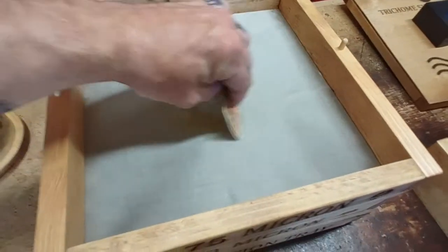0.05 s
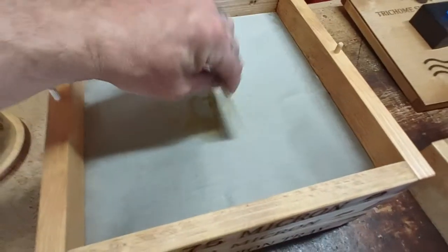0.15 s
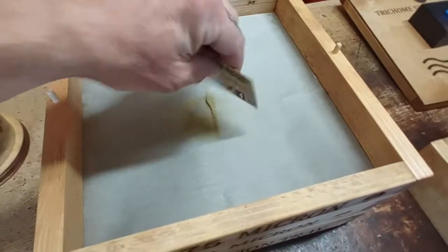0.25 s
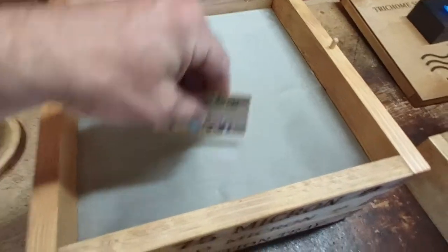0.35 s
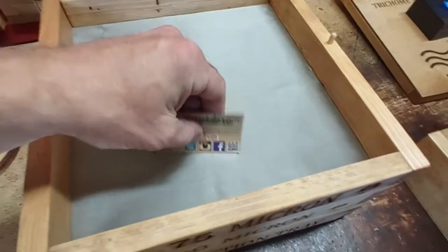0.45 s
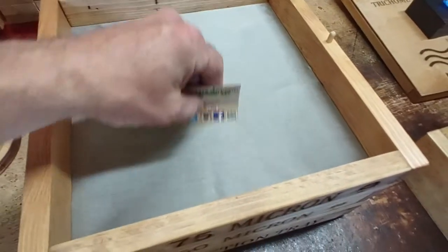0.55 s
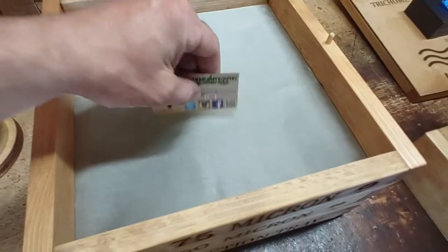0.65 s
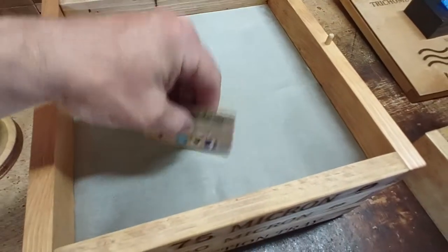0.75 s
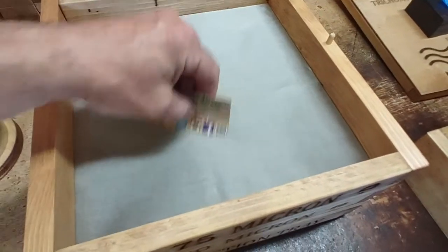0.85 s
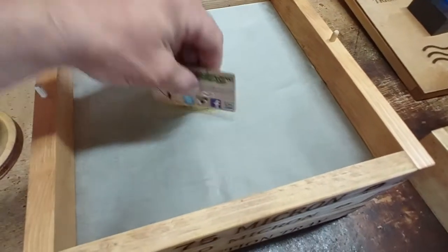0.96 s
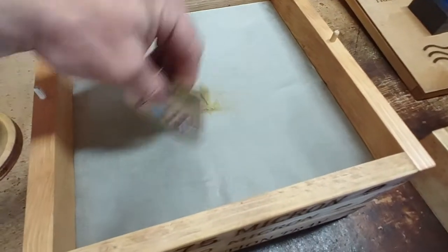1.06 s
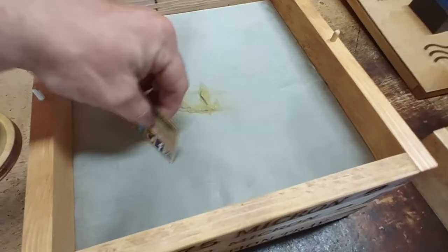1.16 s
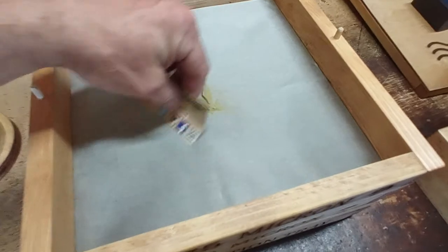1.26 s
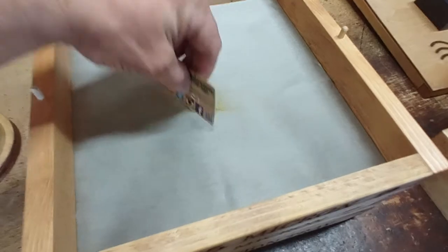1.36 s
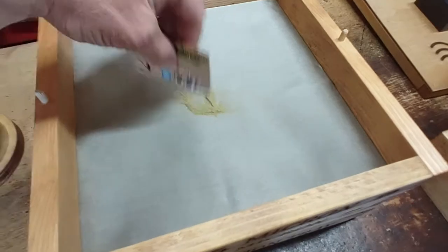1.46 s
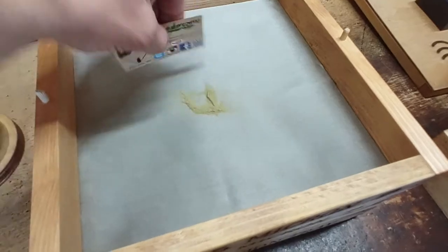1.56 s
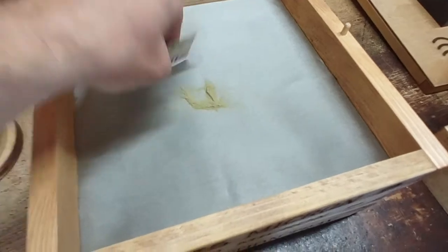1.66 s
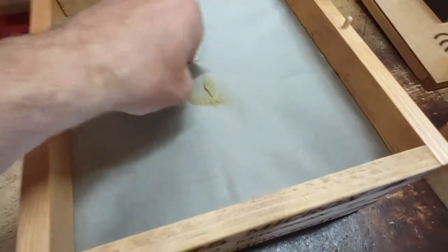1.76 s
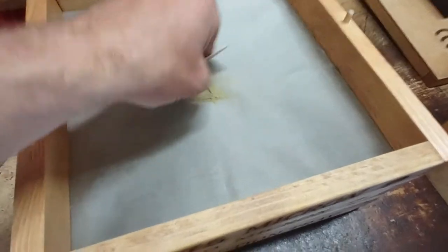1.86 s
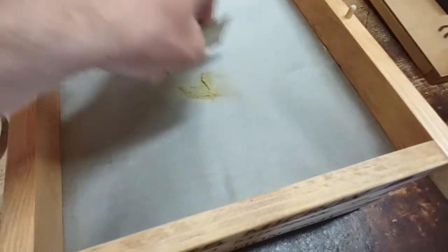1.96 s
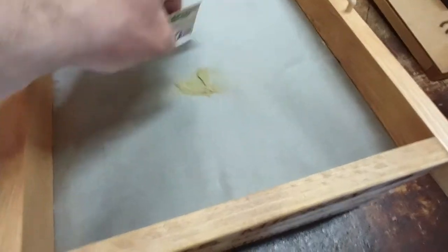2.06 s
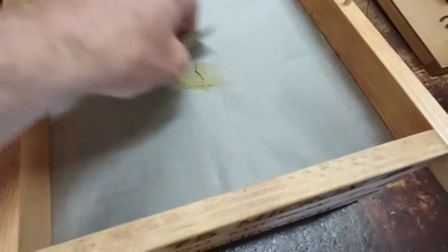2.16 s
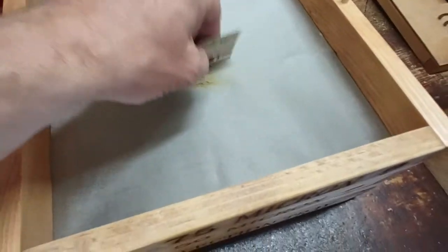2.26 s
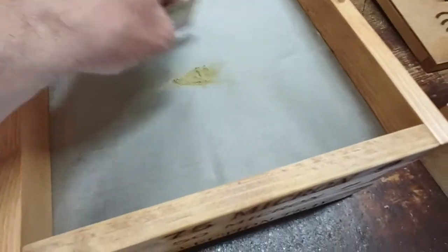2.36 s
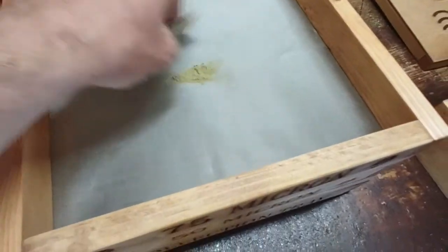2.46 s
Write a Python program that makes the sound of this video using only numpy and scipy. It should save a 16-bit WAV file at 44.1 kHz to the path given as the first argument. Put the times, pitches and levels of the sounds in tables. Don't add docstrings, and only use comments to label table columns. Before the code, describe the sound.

Quick raspy scrapes of a stiff card on fine stretched mesh, first two strongest, then a longer one, a pause with dull taps, and three more; faint finger rustle on the microphone, small quiet room, close.

```python
import sys
import numpy as np
from scipy import signal
from scipy.fft import rfft, irfft
from scipy.io import wavfile

SR = 44100
rng = np.random.default_rng(int(sys.argv[2]) if len(sys.argv) > 2 else 0)


def voltage_ratio(level):
    return 10 ** (np.asarray(level, float) / 20)


def generate_wav(sig):
    pcm = np.round(np.clip(np.atleast_2d(sig).T, -1, 1) * 32767).astype(np.int16)
    wavfile.write(sys.argv[1], SR, pcm)


N = 112455
TIME = np.arange(N) / SR

TRAY_HZ = 1187
RUN_IN_S = 1


def rms_one(x):
    return x / np.sqrt(np.mean(x ** 2) + 1e-20)


def cut(x, hz, kind, order=2):
    return signal.sosfilt(signal.butter(order, hz, kind, fs=SR, output="sos"), x)


def drift(hz):
    run_in = RUN_IN_S * SR
    return rms_one(cut(rng.standard_normal(N + run_in), hz, "low")[run_in:])


def resonance(x, hz, width_hz):
    r = np.exp(-np.pi * width_hz / SR)
    top = np.array([1, 0, -1]) * (1 - r * r) / 2
    return signal.lfilter(top, [1, -2 * r * np.cos(2 * np.pi * hz / SR), r * r], x)


def bells(x, rows):
    for hz, width_hz, db in rows:
        turn = -2 * np.cos(2 * np.pi * hz / SR)
        a = np.sqrt(voltage_ratio(db))
        k = np.tan(np.pi * width_hz / SR)
        x = signal.lfilter([1 + k * a, turn, 1 - k * a], [1 + k / a, turn, 1 - k / a], x)
    return x


def tail(x, t60):
    t = np.arange(SR // 2) / SR
    h = rng.standard_normal((2, len(t))) * voltage_ratio(-60 * t / t60)
    h = h / np.sqrt(np.sum(h ** 2, 1, keepdims=True))
    return signal.fftconvolve(x[None], h, axes=1)[:, :N]


def wire_ticks():
    ticks_per_s, spread_db = 9000, 2.0
    chatter_db, chatter_hz = 0.9, 125
    hits = rng.random((2, N)) < ticks_per_s / SR
    strength = voltage_ratio(spread_db * np.minimum(rng.exponential(1, (2, N)), 4))
    ticks = rms_one(hits * strength * rng.choice([-1, 1], (2, N)))
    return ticks * voltage_ratio(chatter_db * drift(chatter_hz))


# time in seconds, level in dB.
STROKES = [
    [(0.16, -58), (0.182, -54.5), (0.202, -28), (0.22, -24), (0.262, -19.5), (0.306, -25), (0.335, -62)],
    [(0.503, -74), (0.511, -47), (0.529, -45.5), (0.543, -26.5), (0.567, -20.5), (0.609, -19), (0.66, -55)],
    [(0.838, -70), (0.848, -58.5), (0.874, -56), (0.916, -29.5), (0.946, -26.5), (1.048, -26),
     (1.064, -44.5), (1.09, -71)],
    [(1.452, -44), (1.466, -38), (1.492, -29.5), (1.522, -33.5), (1.582, -24.5), (1.612, -29), (1.618, -31),
     (1.645, -66)],
    [(1.805, -64), (1.817, -51.5), (1.845, -45), (1.863, -31.5), (1.895, -26), (1.927, -22.5),
     (1.973, -25.5), (2.0, -62)],
    [(2.14, -75), (2.152, -45), (2.184, -26.5), (2.262, -29.5), (2.285, -64)],
]
# tray drumming in dB at start, at end, brightness in dB at start, at end.
STROKE_COLOURS = [(1, -14.5, 1, 0), (2.5, -23.5, 3, 0.93), (7.5, -15, 3, 1.2), (2, -27.5, -2.5, 1),
                  (-16.5, -4.5, 1, -3.5), (-31, -5.5, 1, 0)]
# level in dB of deep tray, high tray, card bend,
# card edge, wires, and then of the tray at the right port.
STROKE_VOICING = [(4.5, -2, 2.5, 0, 0.91, -3), (-14, -3.3, 2.5, -0.77, 1.6, -9.5),
                  (0.5, 0.48, 0.5, 0.71, 1.5, -14.5), (-8, -1.9, -1.5, -0.39, 2.8, 1.5),
                  (-11, 1.6, -5, -1, 1.4, -3), (-5, 2.8, -3, -1.6, 2.6, 0)]
# pitch in Hz, width in Hz, level in dB.
BODY_RESONANCES = [(555, 55, 0.5), (734, 183, -4), (852, 42, -2), (1361, 94, -0.5), (1457, 620, -11.5),
                   (2186, 127, -4), (2586, 250, -7), (3093, 194, 1), (4020, 670, 3), (3450, 144, -3),
                   (4896, 205, -1), (5418, 207, 2.5), (6030, 136, -11), (10740, 2130, -4)]
RESONANCE_FAMILY = [0, 1, 1, 2, 2, 3, 3, 3, 3, 3, 4, 4, 4, 6]


def scrape():
    fade_s = 0.013
    bright_hz, low_cut_hz = 4530, 413
    plain_db, sway_db, sway_hz = -6.5, 3.8, 30.0
    press, tray_db, bright_db = np.zeros((3, N))
    voice = np.zeros((7, N))
    for rows, colour, voicing in zip(STROKES, STROKE_COLOURS, STROKE_VOICING):
        s, db = np.transpose(rows)
        ends = s[[0, -1]]
        contact = np.clip(np.minimum(TIME - s[0], s[-1] - TIME) / fade_s, 0, 1)
        press += contact * voltage_ratio(np.interp(TIME, s, db))
        tray_db += (contact > 0) * np.interp(TIME, ends, colour[:2])
        bright_db += (contact > 0) * np.interp(TIME, ends, colour[2:])
        voice[:6, TIME > s[0]] = np.array(voicing)[:, None]
    ticks = wire_ticks()
    low = cut(ticks, TRAY_HZ, "low", order=4)
    middle = cut(cut(ticks, TRAY_HZ, "high", order=4), bright_hz, "low")
    high = cut(ticks, bright_hz, "high")
    drive = press * (voltage_ratio(tray_db) * low + middle + voltage_ratio(bright_db) * high) + 1e-18
    body = voltage_ratio(plain_db) * drive
    for (hz, width_hz, db), family in zip(BODY_RESONANCES, RESONANCE_FAMILY):
        level_db = db + voice[family] + sway_db * drift(sway_hz)
        body = body + resonance(drive * voltage_ratio(level_db), hz, width_hz)
    return voltage_ratio(2.5) * cut(body, low_cut_hz, "high", order=4), voice[5]


# start in seconds, level in dB, length in seconds,
# pitch in Hz, sharpness of the pitch (Q).
TOUCHES = [(0.013, -68, 0.093, 2650, 40), (0.054, -61, 0.14, 1450, 30.), (0.106, -64, 0.1, 2214, 20),
           (0.027, -65, 0.2, 1876, 30.), (.238, -36.5, 0.013, 1330, 15.), (0.297, -28, 0.014, 1340, 10),
           (0.885, -45, 0.03, 2900, 20), (0.507, -47.5, 0.021, 2130, 12.), (0.507, -56, 0.019, 3500, 22),
           (0.633, -34, 0.017, 1450, 10), (0.648, -55, .11, 2430, 22.), (0.843, -48, 0.025, 1750, 8),
           (.858, -50, .03, 2050, 10), (.845, -62, .02, 6500, 14), (.881, -56, 0.004, 7550, 2.5),
           (1.05, -33.5, .03, 1810, 6.6), (1.338, -44, 0.016, 2300, 6), (1.337, -54, 0.014, 5600, 12),
           (0.508, -56, .003, 5000, 1.2), (2.357, -66, .02, 3900, 12), (1.64, -62, .06, 2250, 12),
           (.33, -53, .04, 2200, 5), (1.395, -43, 0.016, 2300, 5), (1.397, -54, .018, 4900, 10),
           (1.4, -56, .03, 4000, 14), (1.396, -40.5, 0.028, 1330, 8.), (1.413, -50, .014, 2500, 4),
           (1.468, -44, .02, 900, 10), (1.81, -61, .035, 2600, 2.5), (1.815, -58, .03, 3900, 12),
           (1.9, -42, .08, 830, 9), (2.144, -42, .016, 1900, 3), (2.155, -44, .014, 3900, 10),
           (2.25, -40, .022, 850, 9), (1.837, -59, 0.0018, 9000, 2.5), (2.355, -64, 0.033, 6000, 2.1),
           (2.417, -72, 0.0035, 5000, 1.5), (2.495, -65.5, 0.034, 1700, 12)]


def touches():
    out = np.zeros((2, N))
    grit = rng.standard_normal((2, N))
    for s, db, length, hz, q in TOUCHES:
        shape = np.sin(np.pi * np.clip((TIME - s) / length, 0, 1) ** 0.6)
        ring = resonance(shape * grit + 1e-18, hz, hz / q)
        ring = resonance(ring, hz, 3 * hz / q)
        out += voltage_ratio(db) * np.sqrt(q * SR / hz / 3) * ring
    return out


# pitch in Hz, level in dB, time to fade 60 dB in seconds.
SNAP_MODES = [(2300, 0, .008), (3300, -5, .004), (5400, -1, .006), (7200, -5, .004)]
# delay in seconds, level in dB.
SNAP_BOUNCES = [
    (0, 0),
    (.0019, -4),
    (.0046, -7),
    (.0071, -11),
]


def snap():
    start_s, level_db = 1.6175, -20
    delay_s, bounce_db = np.transpose(SNAP_BOUNCES)
    age = np.maximum(TIME - start_s - delay_s[:, None], 0)
    rings = 0
    for hz, db, t60 in SNAP_MODES:
        rings = rings + voltage_ratio(level_db + db - 60 * age / t60) * np.sin(2 * np.pi * hz * age)
    return cut(voltage_ratio(bounce_db) @ rings, TRAY_HZ, "high", order=4)


# start in seconds, level in dB, pitch in Hz.
BUMPS = [(1.34, -45, 224), (1.395, -49, 330), (1.411, -37, 270), (1.418, -47, 480), (1.424, -42, 130),
         (1.43, -38.5, 205), (2.33, -53, 350), (2.517, -46, 314)]


def bumps():
    t60_s, rise_s = 0.08, 0.003
    out = np.zeros(N)
    for s, db, hz in BUMPS:
        age = np.maximum(TIME - s, 0)
        rise = (1 - np.exp(-age / rise_s)) ** 2
        out += voltage_ratio(db - 60 * age / t60_s) * rise * np.sin(2 * np.pi * hz * age)
    return out


# time in seconds, level in dB.
RUSTLE = [(0, -48.5), (0.013, -48.5), (0.051, -56.5), (0.098, -57.5), (.14, -50), (.19, -48.5),
          (.41, -60.5), (.5, -58.5), (.77, -68), (0.833, -69), (.85, -51.5), (1.09, -50.5), (1.22, -51),
          (1.44, -48.5), (1.7, -53.5), (1.8, -58), (2.07, -67), (2.141, -81)]
# pitch in Hz, width in Hz, level in dB.
RUSTLE_PEAKS = [(10350, 330, 2), (10800, 300, -9), (11400, 330, 3), (11950, 350, -1), (12400, 500, -8)]
# start in seconds, length in seconds, level in dB.
FLICK = (2.355, 0.023, -54.5)


def rustle():
    streak_db, streak_hz = 1.5, 7.4
    right_db, body_db = -10, -14.5
    level_db, flicker_db, flicker_hz = 4.5, -0.5, 40.0
    noise = rng.standard_normal((2, N))
    streaks = 0
    for hz, width_hz, db in RUSTLE_PEAKS:
        streak = resonance(resonance(noise, hz, width_hz), hz, width_hz)
        streaks = streaks + voltage_ratio(db + streak_db * drift(streak_hz)) * streak
    hiss = rms_one(streaks) * voltage_ratio([[0], [right_db]])
    hiss = hiss + voltage_ratio(body_db) * cut(noise, 1500, "high")
    s, db = np.transpose(RUSTLE)
    flick_s, flick_length_s, flick_db = FLICK
    flick = np.sin(np.pi * np.clip((TIME - flick_s) / flick_length_s, 0, 1))
    level = voltage_ratio(np.interp(TIME, s, db)) + voltage_ratio(flick_db) * flick
    return hiss * level * voltage_ratio(level_db + flicker_db * drift(flicker_hz))


# frequency in Hz, level in dB per Hz.
AIR = [(25, -56), (55, -27.5), (110, -5.5), (400, -6), (780, -13.5), (2000, -25), (5000, -36.5),
       (14000, -48)]
# pitch in Hz, level in dB, width in Hz.
HUM = [(64.4, -71, 2.7), (115.3, -67.5, 4.8)]


def air():
    level_db, alike_hz, apart = -59, 527, 0.1
    hz = np.maximum(np.fft.rfftfreq(N, 1 / SR), 1)
    air_hz, air_db = np.transpose(AIR)
    colour = voltage_ratio(np.interp(np.log(hz), np.log(air_hz), air_db))
    difference = apart + hz / np.hypot(hz, alike_hz)
    spectra = rfft(rng.standard_normal((2, N))) * colour
    mid, side = irfft(spectra * [np.ones_like(hz), difference], N)
    noise = rng.standard_normal(N + RUN_IN_S * SR)
    hum = np.zeros(N)
    for hum_hz, db, width_hz in HUM:
        hum += voltage_ratio(db) * rms_one(resonance(noise, hum_hz, width_hz)[RUN_IN_S * SR:])
    return voltage_ratio(level_db) * rms_one(mid + side * np.array([[1], [-1]])) + hum


# frequency in Hz, width in Hz, level in dB.
LEFT_PATH = [(610, 130, 0), (722, 180, 6.5), (1060, 314, -8), (1490, 170, 3), (1940, 100, -3.5)]


def scene():
    screen_from_hz, screen_t60_s, screen_db = 1790, 0.058, -3
    room_cut_hz, room_t60_s, room_db = 4300, 0.25, -15.5
    right_lag_s, touch_ring_db = 0.00024, 0.5
    stroke, right_db = scrape()
    touch = touches() + snap()
    card = stroke + touch
    ringing = stroke[0] + voltage_ratio(touch_ring_db) * touch[0]
    bass = cut(card[0], screen_from_hz, "low")
    n = np.arange(N)
    late_bass = np.interp(n - right_lag_s * SR, n, bass)
    heard = np.array([bass, late_bass]) + cut(card, screen_from_hz, "high")
    heard += voltage_ratio(screen_db) * tail(ringing, screen_t60_s)
    heard += voltage_ratio(room_db) * tail(cut(ringing, room_cut_hz, "low", order=1), room_t60_s)
    left = bells(heard[0], LEFT_PATH)
    right = heard[1] + (voltage_ratio(right_db) - 1) * cut(heard[1], TRAY_HZ, "low", order=1)
    return np.array([left, right]) + bumps() + rustle() + air()


def top_cut(x):
    return signal.sosfilt(signal.butter(12, 16320, fs=SR, output="sos"), x)


# frequency in Hz, width in Hz, level in dB.
LEFT_PORT = [(4750, 1300, 3), (7980, 1240, -4.5), (10060, 5700, 9), (13070, 1270, -9.5),
             (15080, 4000, -15.5)]
RIGHT_PORT = [(1020, 203, -4), (2334, 1260, 8.5), (4540, 370, -1), (5170, 650, 6.5), (7020, 150, 6.5),
              (8710, 770, 11.5), (8180, 5100, 6.5), (10350, 2100, -3), (11800, 740, 3),
              (14180, 1600, -17.5)]
# frequency in
# Hz, width in Hz, level in dB.
NARROW_DIPS = [(8650, 500, -26), (9950, 450, -30), (10350, 450, -30), (12700, 500, -28), (13200, 500, -28)]


def record(dry):
    hiss_db, hiss_hz, top_hz = -84.5, 12500, 15950
    left = bells(dry[0], LEFT_PORT + NARROW_DIPS[:1])
    right = bells(dry[1], RIGHT_PORT + NARROW_DIPS[1:])
    hiss = cut(rng.standard_normal((2, N)), hiss_hz, "high", order=4)
    ports = np.array([left, right]) + voltage_ratio(hiss_db) * hiss
    ports = signal.sosfilt(signal.cheby2(12, 60, top_hz, fs=SR, output="sos"), ports)
    return top_cut(ports)


dry = scene()
out = record(dry)
generate_wav(out)
```